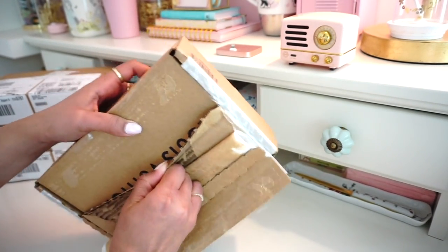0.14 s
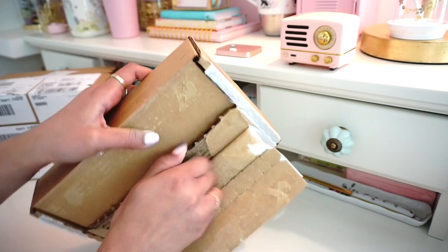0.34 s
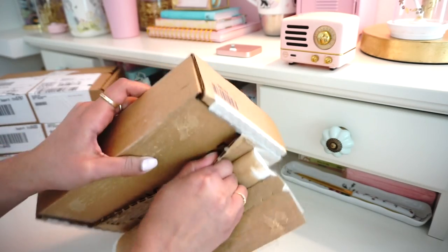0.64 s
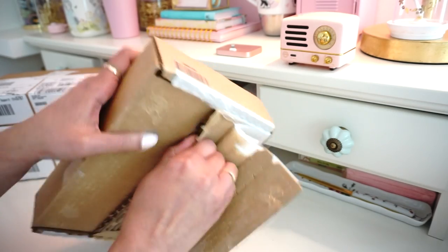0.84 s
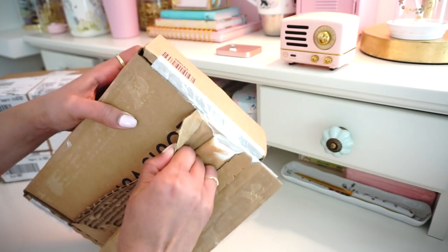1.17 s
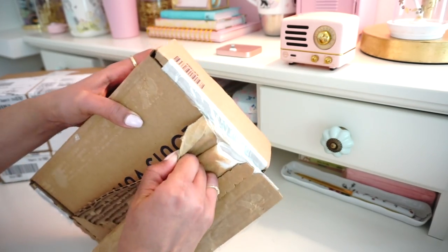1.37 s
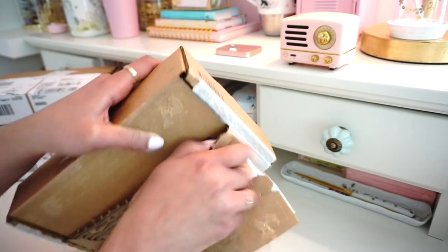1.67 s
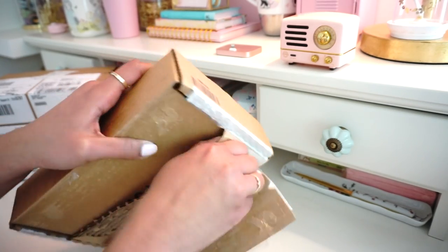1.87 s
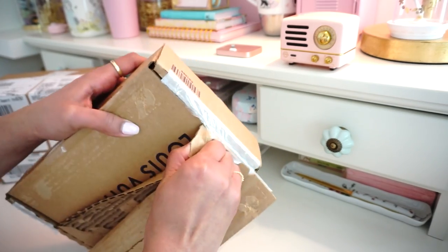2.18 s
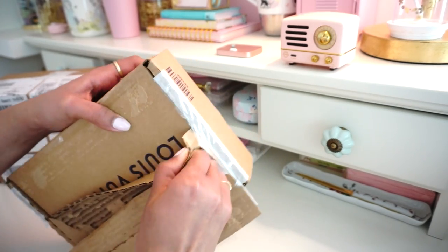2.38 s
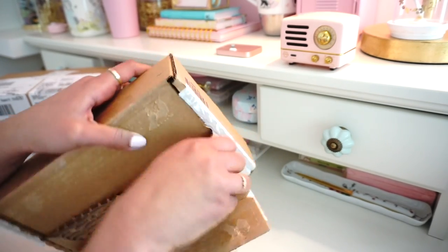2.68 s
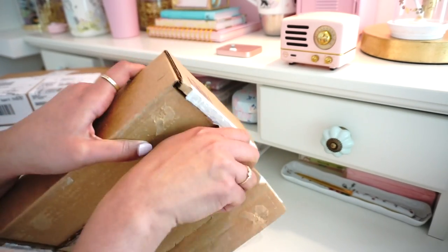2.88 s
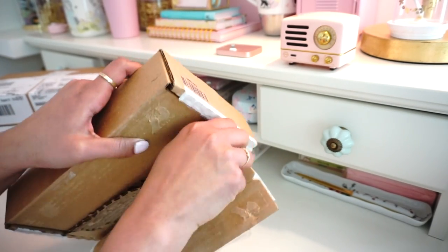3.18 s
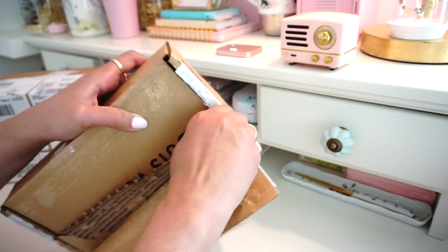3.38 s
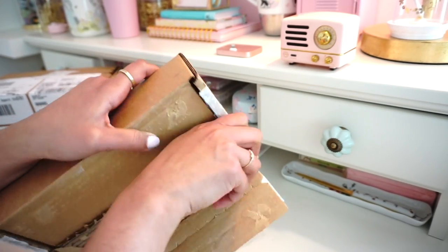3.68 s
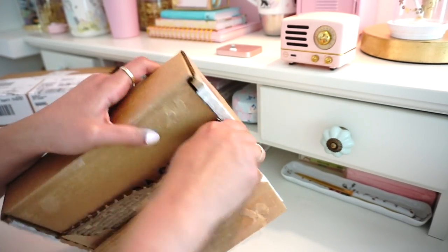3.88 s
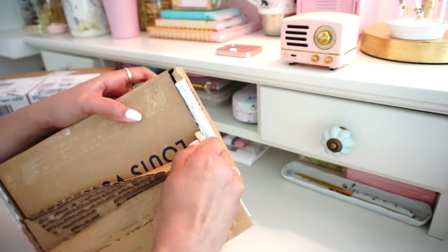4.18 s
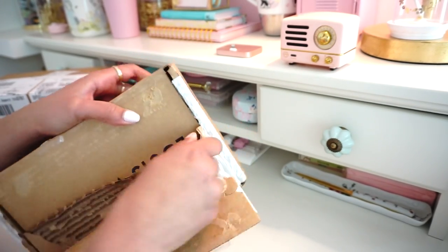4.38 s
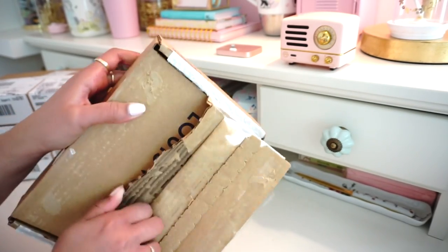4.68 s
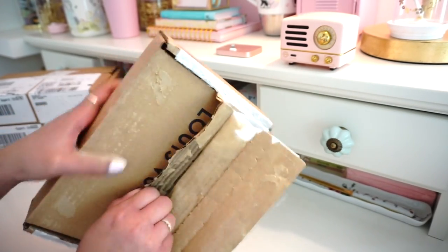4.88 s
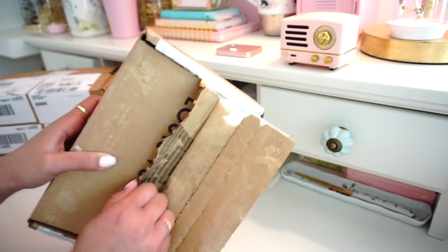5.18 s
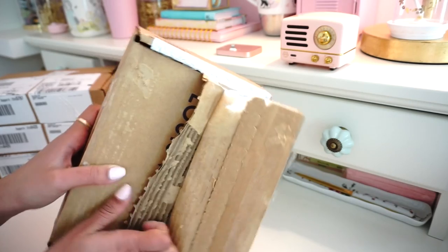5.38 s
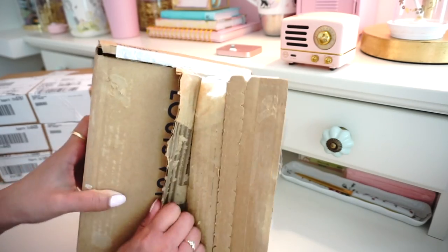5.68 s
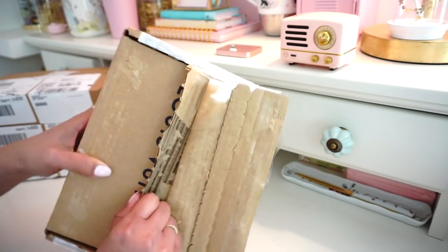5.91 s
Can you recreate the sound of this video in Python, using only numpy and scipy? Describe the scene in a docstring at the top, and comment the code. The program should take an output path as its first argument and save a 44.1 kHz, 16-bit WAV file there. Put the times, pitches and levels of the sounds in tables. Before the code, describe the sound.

A corrugated cardboard box is ripped open by hand, very close. Short, uneven, bright tearing pulls alternate with brief near-quiet gaps. Flutes crunch and crackle, glued spots snap sharply, and the panels crack and knock with hollow low thumps. The first half is sparser; the second grows denser and heavier, with the strongest knocks near five seconds and at the end. Small dry room, faint hiss, stereo with the box slightly left.

```python
"""Dense bright rips come in short pulls, with crackle, sharp snaps and hollow booms, in a small furnished room.
A corrugated cardboard box is torn open close by: noise gated by random ruptures is the parting fibres,
damped blips and ringing panels are buckling flutes, short noise bursts are glued spots that snap.
A crack in the panels and decaying box modes sound when the wall springs back.
A diffuse reverberant tail and faint coloured noise are the room, air and microphone hiss."""
import sys
import numpy as np
from scipy import signal
from scipy.fft import rfft, irfft, next_fast_len
from scipy.io import wavfile
from scipy.ndimage import uniform_filter1d, map_coordinates

SR = 44100
rng = np.random.default_rng(int(sys.argv[2]) if len(sys.argv) > 2 else 0)


def inscribe(sig):
    """Save sig as 16-bit PCM at rate SR to the path in sys.argv[1].

    A 1-D sig is mono; a 2-D sig holds one channel per row.
    Samples are clipped to [-1, 1] before scaling.
    """
    pcm = np.round(np.clip(np.atleast_2d(sig).T, -1, 1) * 32767)
    wavfile.write(sys.argv[1], SR, pcm.astype(np.int16))


N = 266672

# Room tone and hiss spectrum. Each row: frequency in Hz, relative level in dB.
AIR_SPECTRUM = [(25, 28), (340, 4), (600, 30), (5000, -66), (15700, -46)]
# Room decay. Each row: frequency in Hz, t60 in seconds.
ROOM_DECAY = [(200, 0.23), (2000, 0.13), (10000, 0.045)]
# Stereo width. Each row: frequency in Hz, left-right likeness (1 = identical).
STEREO_LIKENESS = [(40, 0.77), (200, 1), (600, 0.85), (2000, 0.54), (6000, 0.063)]
# Modes of the hollow box. Each row: frequency in Hz, relative level in dB, t60 in seconds.
HOLLOW_MODES = [(122, -11, 0.058), (195.6, -2, 0.039), (290, 2, 0.039), (374.3, -0.5, 0.037),
                (507.4, -4.5, 0.028)]
# Panel resonances. Each row: frequency in Hz, width in Hz, relative level in dB.
PANEL_MODES = [(707, 81, 6.5), (882, 44, -2.5), (1278, 112, 0.5), (1633, 107, -3.5), (2484, 1730, 0)]
# Glued spots snap. Each row: start in seconds, level in dB, pitch in Hz.
GLUE_SNAPS = [(0.167, -30, 3740), (0.348, -36, 4800), (0.3648, -24.5, 6300), (0.99, -29.5, 9500),
              (1.135, -28, 4560), (1.4046, -25, 9400), (1.429, -24, 12200), (1.5829, -31.5, 2470),
              (1.604, -32.5, 4500), (1.643, -35.5, 4900), (1.915, -29, 2660), (2.055, -31, 2950),
              (2.227, -29.5, 900), (2.396, -23, 2940), (2.6314, -27, 9000), (2.6751, -20.5, 3770),
              (2.812, -26, 5500), (3.352, -35, 6050), (3.606, -34.5, 2380), (3.916, -26.5, 5100),
              (3.99, -22, 12000), (4.061, -19, 2580), (4.1816, -21, 11900), (4.23, -23.5, 6900),
              (4.375, -38, 2820), (4.389, -30.5, 2500), (4.455, -21, 4400), (4.469, -22, 10200),
              (4.499, -20.5, 11100), (5.11, -42, 7200), (5.471, -35, 10100), (5.487, -16, 12000),
              (5.587, -30.5, 3680), (5.662, -21.5, 8700), (5.7304, -19, 2250), (5.823, -25, 5730)]
# The wall springs back. Each row: start in seconds, crack peak in dB, boom peak in dB, crack pitch in Hz.
WALL_KNOCKS = [(0.475, -15.5, -18, 1180), (0.887, -13, -28, 910), (1.679, -16.5, -21.5, 1780),
               (1.734, -9, -43, 3200), (1.998, -52, -20, 800), (2.04, -35, -22, 990),
               (2.683, -20, -20, 2540), (2.834, -39, -20, 880), (2.985, -23, -15, 1250),
               (3.218, -28, -25.5, 830), (3.319, -37, -28.5, 1450), (3.469, -71, -23.5, 815),
               (3.677, -19.5, -20.5, 1340), (3.799, -10, -17, 1900), (3.919, -12, -26, 2870),
               (4.028, -22, -18, 1970), (4.095, -21, -13, 1110), (4.597, -16, -24.5, 895),
               (4.876, -9.5, -18, 1170), (4.976, -12, -7.5, 1970), (5.0087, -10, -10.5, 1370),
               (5.385, -11.5, -19, 1540), (5.432, -10.5, -9.5, 1450), (5.507, -18.5, -20, 1660),
               (5.747, -11, -8.5, 2460), (5.991, -13.5, -17.5, 1570), (6.0261, -3.5, -17, 2110)]
# Spectrum of ripping fibres. Each row: frequency in Hz, relative level in dB.
FIBRE_SPECTRUM = [(700, -59), (1800, -14), (3000, -10), (6000, -9.5), (8000, -6), (11000, 0.5), (15700, -2)]
# The hand tugs and fibres rip. Each row: start in seconds, length in seconds, mid-tug level in dB,
# swell from start to end in dB.
RIP_TUGS = [(-0.007, 0.051, -32, 3.5), (0.301, 0.24, -33.5, -7.5), (0.406, 0.11, -24.5, 1),
            (0.506, 0.2, -34, 1), (0.726, 0.049, -29.5, -12), (0.889, 0.053, -22, -10),
            (1.026, 0.019, -32, -4), (1.145, 0.12, -28, 9), (1.304, 0.15, -32, -15.5),
            (1.575, 0.051, -37.5, 16), (1.691, 0.034, -25.5, -7), (1.733, 0.08, -21.5, -3.5),
            (1.836, 0.12, -25.5, 2), (2.01, 0.039, -44, 0), (2.183, 0.077, -34.5, 1), (2.353, 0.14, -25, 2),
            (2.659, 0.21, -27.5, -4), (2.98, 0.068, -25.5, -9), (3.189, 0.02, -32, 2),
            (3.334, 0.12, -29.5, 6.5), (3.475, 0.13, -25.5, -3.5), (3.666, 0.071, -22.5, 5.5),
            (3.76, 0.13, -24, 1.5), (3.95, 0.12, -22.5, 10), (4.076, 0.24, -29, -17.5),
            (4.386, 0.14, -29.5, -1), (4.531, 0.19, -22.5, 1.5), (4.83, 0.16, -21, 4.5),
            (5.278, 0.23, -24.5, 5.5), (5.541, 0.15, -30, -3), (5.85, 0.21, -35, -0.5)]
# Stretches of flutes buckle. Each row: start in seconds, length in seconds, crunch level in dB,
# hollow rumble level in dB, crunch pitch in Hz.
FLUTE_FOLDS = [(0.471, 0.061, -30, -55, 1200), (0.546, 0.03, -23, -53, 1570),
               (0.617, 0.19, -33, -48.5, 1620), (0.856, 0.062, -34.5, -37.5, 1120),
               (1.024, 0.01, -28, -33, 1450), (1.136, 0.092, -33, -29.5, 1340),
               (1.273, 0.088, -38, -40, 1920), (1.738, 0.081, -28, -32, 1700),
               (1.866, 0.14, -34, -51, 2090), (2.139, 0.14, -37.5, -47.5, 1020),
               (2.334, 0.12, -35, -35.5, 850), (2.815, 0.076, -42, -40, 1560),
               (2.981, 0.04, -33, -37, 1430), (4.042, 0.14, -28, -40, 1610), (4.53, 0.038, -38.5, -40, 790),
               (4.608, 0.1, -27, -38, 1060), (5, 0.027, -29.5, -42, 1260), (5.388, 0.13, -37, -58, 1520),
               (5.738, 0.0089, -28, -27.5, 2620), (5.823, 0.0033, -26, -59, 2240)]

TOP_HZ = 15780
# a tug bites fast and lets go more slowly
RIP_RISE_DB_PER_S, RIP_FALL_DB_PER_S, RIP_REST_DB = 763, 512, -49.5
FOLD_RISE_DB_PER_S, FOLD_FALL_DB_PER_S = 998, 334
# the box creaks faintly in the hands
CRUNCH_REST_DB, RUMBLE_REST_DB, REST_HZ = -53.5, -58, 1860
# every rip also shakes the flutes and the hollow, this far under it
DRAG_CRUNCH_DB, DRAG_RUMBLE_DB = -21, -22.5
# treble above the edge loses this many extra dB per dB of rip under full force
SHEEN_HZ, SHEEN_DB_PER_DB, FULL_RIP_DB = 8750, 0.31, -10
PANEL_OCTAVE_DB = -7  # panel gain one octave from the pitch; grows with octaves squared
CONTROL_STEP = 64  # samples


def amp(db):
    """dB to gain."""
    return 10 ** (np.asarray(db) / 20)


def unit(x):
    """Scaled to rms 1."""
    return x / np.sqrt(np.mean(x ** 2) + 1e-20)


def along(points, hz):
    """Interpolates (Hz, value) points on a log frequency axis."""
    f, v = np.transpose(points)
    return np.interp(np.log(hz + 1), np.log(f + 1), v)


def wobble(knots_per_s):
    """A smooth random curve."""
    knots = rng.standard_normal(int(N * knots_per_s / SR) + 4)
    return map_coordinates(knots, [np.arange(N) * knots_per_s / SR])


def filtered(x, response):
    """Multiplies the spectrum of x by a response of frequency."""
    size = next_fast_len(N + SR // 2)
    return irfft(rfft(x, size) * response(np.fft.rfftfreq(size, 1 / SR)), size)[..., :N]


def resonances(modes):
    """Causal response of parallel (Hz, width Hz, dB) resonators, signs alternating."""
    def response(f):
        total = 0
        for k, (centre, width, db) in enumerate(modes):
            damping = 1j * f * width
            total = total + (-1) ** k * amp(db) * damping / (centre * centre - f * f + damping)
        return total
    return response


def spread(pair):
    """Mixes two signals to left and right: alike in the bass, apart in the treble."""
    def mid_side_gains(hz):
        turn = np.arccos(np.clip(along(STEREO_LIKENESS, hz), -1, 1)) / 2
        return np.sqrt(2) * np.array([np.cos(turn), np.sin(turn)])
    mid, side = filtered(pair, mid_side_gains)
    return np.array([mid + side, mid - side]) / np.sqrt(2)


def air():
    """The quiet room and the microphone hiss: steady coloured noise."""
    noise = rng.standard_normal((2, N))
    return amp(-71) * unit(filtered(noise, lambda hz: amp(along(AIR_SPECTRUM, hz))))


def room(x):
    """Diffuse reverberation: a noise tail whose frequencies each die at their own speed."""
    hz, t, z = signal.stft(rng.standard_normal((2, SR // 3)), SR, nperseg=256)
    decay = amp(-60 * t / along(ROOM_DECAY, hz)[:, None])
    tail = signal.istft(z * decay, SR, nperseg=256)[1]
    tail = tail / np.linalg.norm(tail[0])
    delayed = np.pad(x, (200, 0))[None]  # samples
    return signal.fftconvolve(delayed, tail, axes=1)[:, :N]


def snaps():
    """Each glued spot gives a short burst around its pitch with a broad crack and a ragged tail."""
    out, t = np.zeros((2, N + SR)), np.arange(SR // 25) / SR
    decay = 1.7 * amp(-60 * t / 0.011) + 0.44 * amp(-60 * t / 0.1)
    for start_s, level_db, hz in GLUE_SNAPS:
        edges_hz = [hz * 0.63, min(hz * 1.51, TOP_HZ)]
        band = signal.butter(2, edges_hz, "bandpass", fs=SR, output="sos")
        noise = rng.standard_normal((2, len(t)))
        burst = unit(signal.sosfilt(band, noise)) + 0.58 * noise
        out[:, round(start_s * SR):][:, :len(t)] += amp(level_db) * burst * decay
    return out[:, :N]


def knocks():
    """Each spring-back cracks in the panels near its pitch, and the hollow rings at varied mode strengths."""
    out, t = np.zeros((2, N + SR)), np.arange(SR // 5) / SR
    f = np.fft.rfftfreq(len(t), 1 / SR)
    swing = 1 - np.exp(-t / 0.0024)  # the wall needs a moment to move
    shiver = amp(-60 * t / 0.023) + 0.076 * amp(-60 * t / 0.41)
    for start_s, crack_db, boom_db, hz in WALL_KNOCKS:
        boom = np.zeros(len(t))
        for mode_hz, db, t60 in HOLLOW_MODES:
            mode_db = db + 3 * rng.standard_normal()
            boom += amp(mode_db - 60 * t / t60) * np.sin(2 * np.pi * mode_hz * t)
        boom *= swing
        board = [(c, w, db + PANEL_OCTAVE_DB * np.log2(c / hz) ** 2) for c, w, db in PANEL_MODES]
        board.append((hz, 1.2 * hz, 0))
        dulling = 1 / (1 + 1j * f / (3 * hz)) ** 2  # thick board dulls the blow
        blow = shiver * rng.standard_normal((2, len(t)))
        crack = irfft(rfft(blow) * resonances(board)(f) * dulling, len(t))
        first = round(start_s * SR)
        out[0, first:][:len(t)] += amp(boom_db) * boom / np.abs(boom).max()
        crack_peak = np.abs(crack).max(axis=1, keepdims=True)
        out[:, first:][:, :len(t)] += amp(crack_db) * crack / crack_peak
    return out[:, :N]


def stroke(start_s, length_s, db, rise, fall, swell_db=0):
    """Power of one stroke: straight rise, hold with a swell, straight fall, in dB over time."""
    t = np.arange(0, N, CONTROL_STEP) / SR - start_s
    through = np.clip(t / max(length_s, 1e-3), 0, 1)
    held_db = db + swell_db * (through - .5)
    return amp(held_db - rise * np.maximum(-t, 0) - fall * np.maximum(t - length_s, 0)) ** 2


def per_sample(coarse):
    """Interpolates a coarse control to every sample."""
    return np.interp(np.arange(N), np.arange(0, N, CONTROL_STEP), coarse)


def effort():
    """Gains of rip, crunch and rumble, and the crunch pitch averaged by fold power."""
    rip = sum(stroke(s, length, db, RIP_RISE_DB_PER_S, RIP_FALL_DB_PER_S, swell_db)
              for s, length, db, swell_db in RIP_TUGS)
    shapes = np.array([stroke(s, length, 0, FOLD_RISE_DB_PER_S, FOLD_FALL_DB_PER_S)
                       for s, length, *_ in FLUTE_FOLDS])
    crunch_db, rumble_db, fold_hz = np.transpose(FLUTE_FOLDS)[2:]
    fold_power = amp(crunch_db) ** 2
    loose = amp(CRUNCH_REST_DB) ** 2 + amp(DRAG_CRUNCH_DB) ** 2 * rip
    crunch_power = fold_power @ shapes + loose
    pitch_hz = ((fold_power * fold_hz) @ shapes + loose * REST_HZ) / crunch_power
    rumble = amp(rumble_db) ** 2 @ shapes + amp(RUMBLE_REST_DB) ** 2 + amp(DRAG_RUMBLE_DB) ** 2 * rip
    powers = rip + amp(RIP_REST_DB) ** 2, crunch_power, rumble
    return [per_sample(np.sqrt(power)) for power in powers] + [per_sample(pitch_hz)]


def breaks(rate_per_s, scatter_db, life_s, bed):
    """Two noises gated by decaying random ruptures, a few larger than the rest, over an even bed."""
    happen = rng.random(N) < rate_per_s / SR
    sizes = happen * amp(scatter_db * np.minimum(rng.exponential(size=N), 3))
    bursts = signal.lfilter([1], [1, -np.exp(-1 / (life_s * SR))], sizes)
    return (unit(bursts) + bed) * rng.standard_normal((2, N))


def patchy(pair, depth_db):
    """Random gain patches in time and frequency: the torn edge keeps changing its colour."""
    z = signal.stft(pair, nperseg=256)[2]
    field = uniform_filter1d(rng.standard_normal(z.shape[1:]), size=14, axis=0)
    field = uniform_filter1d(field, size=24, axis=1)
    return signal.istft(z * amp(depth_db * unit(field)), nperseg=256)[1][:, :N]


def crunch(centre_hz, rate_per_s, spread_oct, cycles, scatter_db):
    """Flutes buckling one by one: damped blips of scattered pitch and size, random polarity per channel."""
    draw = rng.standard_normal((5000, 4))
    start = (rng.random(len(draw)) * N).astype(int)
    hz = centre_hz[start] * 2 ** (spread_oct * draw[:, 0])
    kept = rng.random(len(draw)) < rate_per_s * N / SR / len(draw)
    size = kept * amp(scatter_db * np.minimum(np.abs(draw[:, 1]), 2))
    turns = np.outer(hz, np.arange(SR // 80) / SR)
    blips = size[:, None] * np.sin(2 * np.pi * turns) * np.exp(-turns / cycles)
    place = (start[:, None] + np.arange(turns.shape[1])).ravel()
    channels = []
    for side in draw[:, 2:].T:
        signed = blips * np.sign(side)[:, None]
        channels.append(np.bincount(place, signed.ravel(), N + SR)[:N])
    return np.array(channels)


def ripping(rip_gain, jerk):
    """Fibres part in dense bright ruptures; weaker tugs sound duller."""
    fibres = amp(0.64 * jerk) * breaks(820, scatter_db=5.0, life_s=0.0034, bed=1.0)
    rip = filtered(patchy(fibres, depth_db=4.5), lambda hz: amp(along(FIBRE_SPECTRUM, hz)))
    sheen = filtered(rip, lambda hz: 1 / (1 + (SHEEN_HZ / (hz + 1)) ** 6))
    rip = rip + sheen * ((rip_gain / amp(FULL_RIP_DB)) ** SHEEN_DB_PER_DB - 1)
    # single thick fibres
    crackle = unit(crunch(np.full(N, 6000), rate_per_s=350, spread_oct=0.5, cycles=2.5, scatter_db=9))
    return rip_gain * (unit(rip) + amp(-14 + 2 * jerk) * crackle)


def buckling(crunch_gain, flap_hz, jerk):
    """A small loose flap crunches high, a whole wall low; panel modes near that pitch ring along."""
    flutes = unit(crunch(flap_hz, rate_per_s=500, spread_oct=0.523, cycles=3.7, scatter_db=5.0))
    shake = breaks(230, scatter_db=0.6, life_s=0.011, bed=0.21)
    near = amp(PANEL_OCTAVE_DB * np.log2(flap_hz / np.array(PANEL_MODES)[:, :1]) ** 2)
    near = near / np.linalg.norm(near, axis=0)
    panels = sum((-1) ** k * gain * filtered(shake, resonances([mode]))
                 for k, (gain, mode) in enumerate(zip(near, PANEL_MODES)))
    body = amp(1.7 * jerk + 1.8 * wobble(70)) * (flutes + 1.17 * unit(panels))
    return crunch_gain * unit(body)


def rumbling(rumble_gain, jerk):
    """The drag shakes the hollow: ruptures excite the box modes, which ring on briefly."""
    modes = [(hz, 0.71 / t60 + 25, db) for hz, db, t60 in HOLLOW_MODES]
    shake = amp(0.2 * jerk) * breaks(220, scatter_db=0.35, life_s=0.00059, bed=0.88)
    return rumble_gain * unit(filtered(shake, resonances(modes)))


def pulls():
    """Tearing: rip, crunch and rumble follow the hand's effort and share one jerky advance."""
    rip_gain, crunch_gain, rumble_gain, flap_hz = effort()
    jerk = wobble(35)  # the tear advances flute by flute
    rip = ripping(rip_gain, jerk)
    return rip + buckling(crunch_gain, flap_hz, jerk) + rumbling(rumble_gain, jerk)


def scene():
    """The box, a little to the left, in its room."""
    box = pulls() + knocks() + snaps()
    wide = spread(box + amp(-12.5) * room(box[0]) + air())

    def placement(hz):
        lean_db = along([(500, 0.2), (6000, 0.77)], hz)
        lead_rad = along([(600, 0.053), (4800, 0.29), (8500, 0.05)], hz)  # left leads, most in mid range
        return amp(np.outer([1, -1], lean_db)) * np.exp(np.outer([1j, -1j], lead_rad))
    return filtered(wide, placement)


def record(dry):
    """The camera trims the deep bass and keeps nothing above its band limit."""
    return filtered(dry, lambda hz: (1j * hz / (95 + 1j * hz)) ** 3 * (hz < TOP_HZ))


dry = scene()
out = record(dry)
inscribe(out)
```